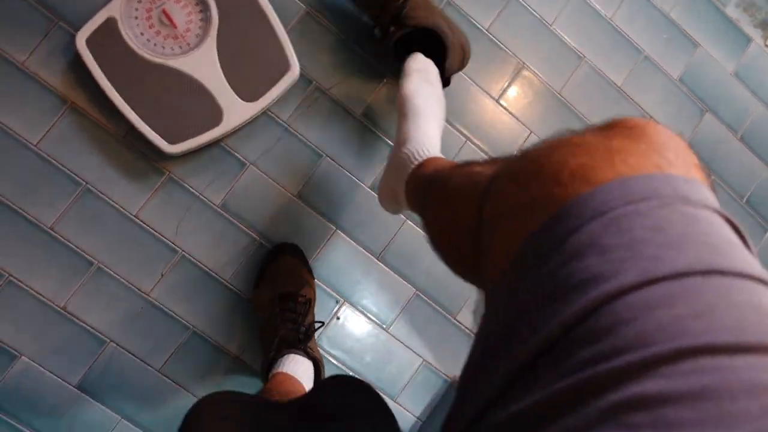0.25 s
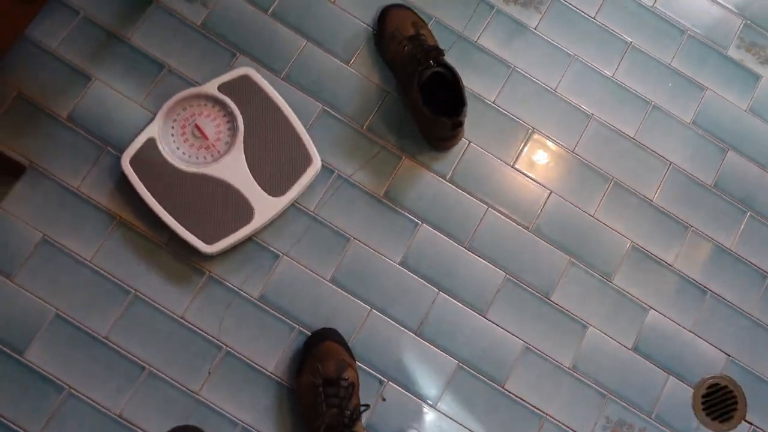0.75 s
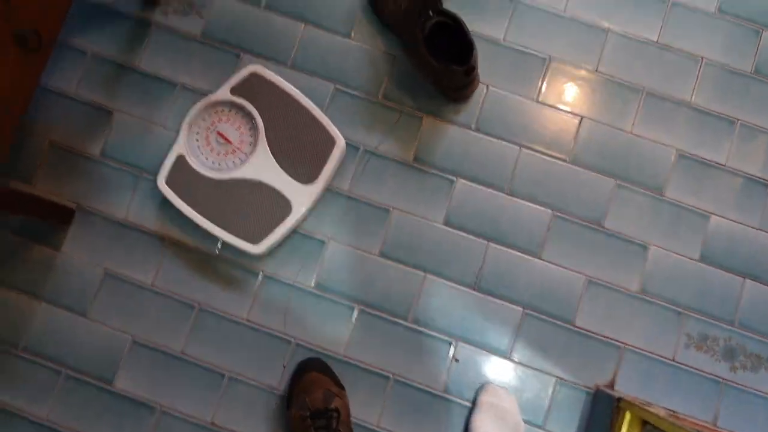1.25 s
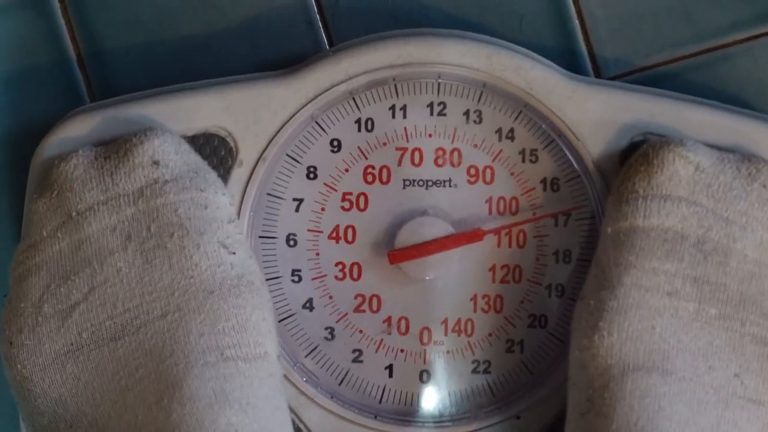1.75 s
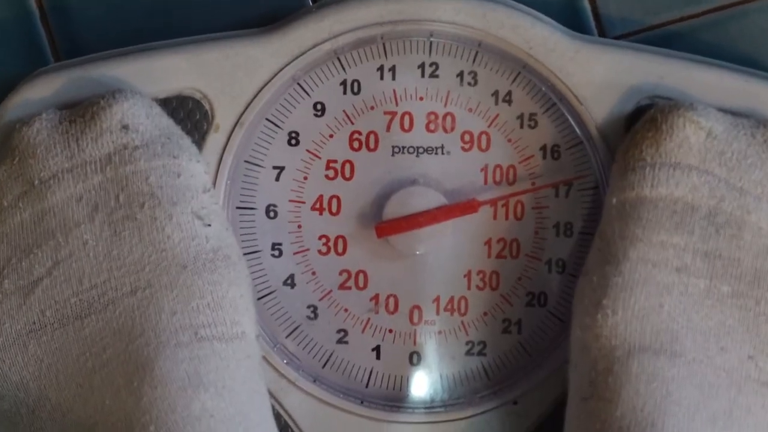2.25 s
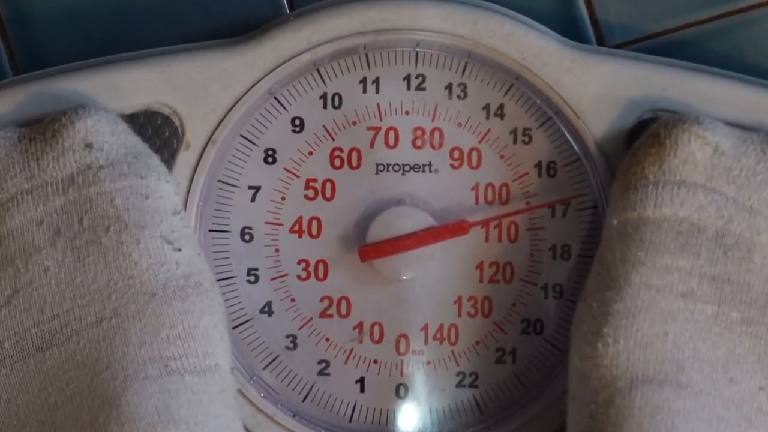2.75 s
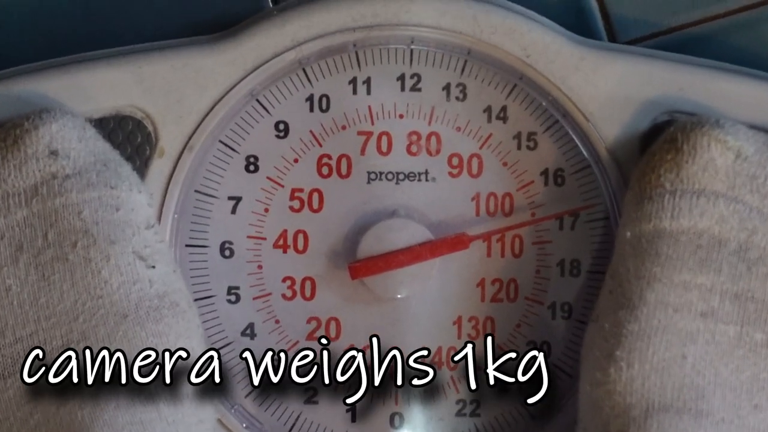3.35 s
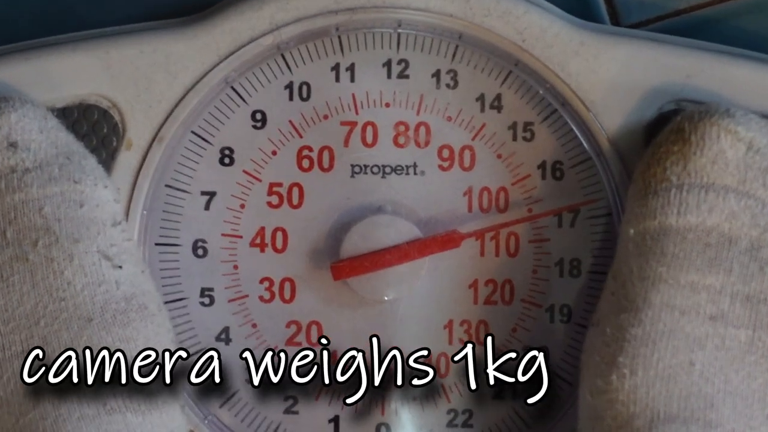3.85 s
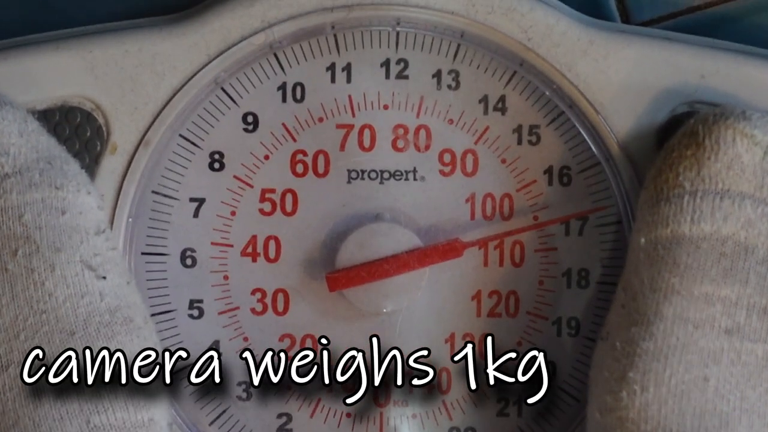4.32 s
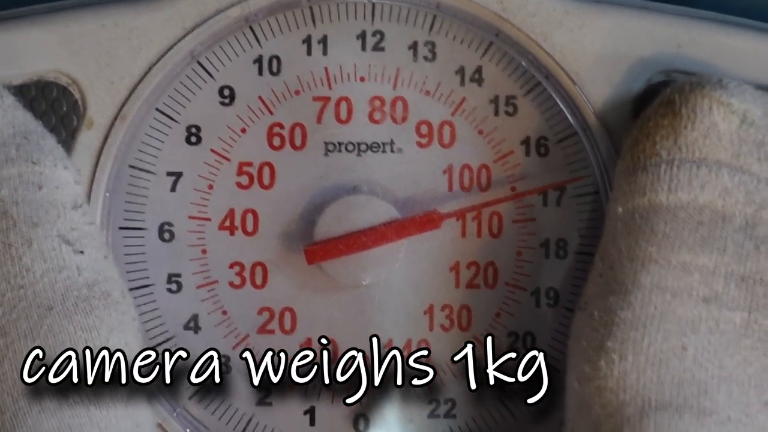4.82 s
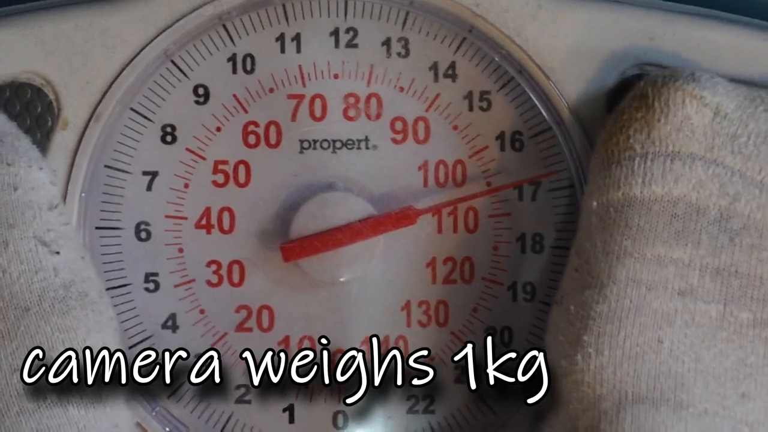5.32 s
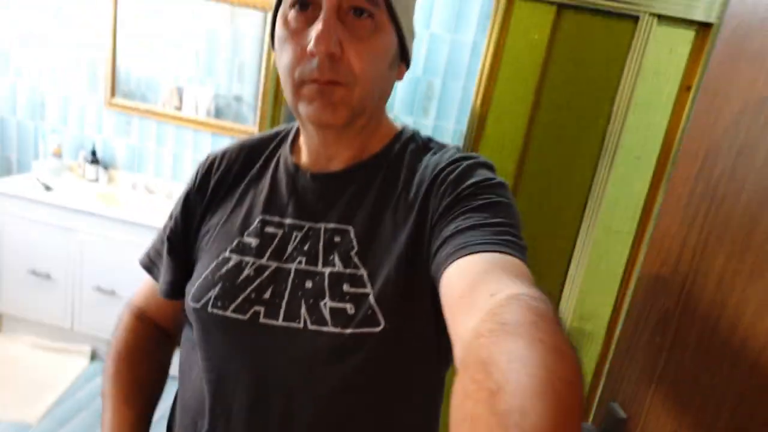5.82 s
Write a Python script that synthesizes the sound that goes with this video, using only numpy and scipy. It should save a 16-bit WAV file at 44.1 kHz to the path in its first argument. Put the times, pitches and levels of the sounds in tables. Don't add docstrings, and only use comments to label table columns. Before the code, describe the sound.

A close hand-held microphone in a tiled, ringing bathroom. At 0 s cloth brushes off a shoe, which is kicked with a hollow knock and bright slap. It lands with loud booms and hard slaps at about 0.37-0.45 s, bounces at 0.6 s and rocks at 0.75 s. Socks drag softly from 0.9 to 1.25 s, with two muted late shoe knocks. At 1.42-1.58 s a spring scale gives a swelling, gritty metallic rasp, cut short into a brief low settling. Then it is quiet: low hum, street wash, hiss, a faint engine around 2.6 and 3.1 s. A fluttering bird call that drops in pitch comes at 2, 3 and 4 s, with tiny distant twitters and a thin whistle near 2.5 s. Dry dial ticks at 5.3 s. At 5.67 s hum and street cease; until 6.1 s fingers click, bump and rustle on the camera casing.

```python
import sys
import numpy as np
from scipy import signal
from scipy.fft import rfft, irfft, next_fast_len
from scipy.io import wavfile
from scipy.ndimage import map_coordinates

SR = 44100
rng = np.random.default_rng(int(sys.argv[2]) if len(sys.argv) > 2 else 0)


def nominal_scale(level):
    x = np.asarray(level, float) / 20
    return 10 ** x


def generate_wav(sig):
    pcm = np.round(np.clip(np.atleast_2d(sig).T, -1, 1) * 32767).astype(np.int16)
    wavfile.write(sys.argv[1], SR, pcm)


N = 268216
T = np.arange(N) / SR
LEAD = 128

# freq_hz, likeness
FAR_LIKENESS = [(60, 1), (180, 0.71), (550, 0.14), (1650, 0.067), (4970, 0.3655), (15000, 0.57)]
NEAR_LIKENESS = [(60, .98), (500, .97), (1000, .86), (2000, .83), (4000, .73), (8000, .65)]
# freq_hz, t60_s
BATHROOM_T60 = [(150, 0.9), (500, 0.68), (2000, 0.49), (5000, 0.57), (12000, 0.49)]
YARD_T60 = [(2000, 0.42), (5000, 0.95)]
# freq_hz, width_hz, level_db
STANDING_WAVES = [(223.5, 3, -12), (421.7, 5.2, 10), (505, 9, -1.5), (563, 14, -1.5), (569, 10, -2),
                  (667, 16, -7)]

# freq_hz, level_db (per Hz)
HUM_TONE = [(15, -71.5), (25, -41), (37, -34.5), (46, -16), (56, -9), (75, 2), (129, -5), (162, 2.5),
            (188, -12.5), (221, 4), (281, -8), (441, -17.5), (500, -14), (650, -39), (1100, -120)]
STREET_TONE = [(180, -26.5), (300, -3.5), (366, -7.5), (760, -6.5), (886, -3), (1020, -9.5), (1800, -10),
               (2650, -21.5), (3120, -19), (4140, -33.5), (5000, -30), (6500, -46.5), (11000, -120)]
HISS_TONE = [(1760, -27.5), (3000, -6.5), (4170, -3), (4970, -6.5), (6300, -7), (15100, -12), (16000, -20)]
# hum_db, street_db, hiss_db
FIRST_BALANCE_DB = [5.3, 3.2, -1.5]
HUM_DB, STREET_DB, MIC_DB = -63.5, -64, -75.5
FIRST_CHANGE_S = 1.585
# start_s, end_s
SECOND_CHANGE = (5.664, 5.677)
DUCK_DB, RECOVER_AT_S, RECOVER_S = -5, 2.36, 0.07
RISE_DB = 19
# loudest_s, rise_s, level_db, fade_db_per_s
ENGINE = [
    (2.586, .25, -61.5, 11),
    (3.112, .2, -68, 30),
]
ENGINE_END = (2.96, 3.3)
ENGINE_TONE = [(225, -37.5), (255, -3.5), (270, 2.0), (300, -49.5)]  # freq_hz, level_db (per Hz)
# loudest_s, rise_s, level_db, fade_db_per_s
FAR_BIRDS = [
    (1.65, .15, -78.5, 127.5),
    (1.94, .011, -80.5, 249.5),
    (2.4, .025, -84.5, 13),
    (3.21, .6, -91, 150),
    (3.51, .06, -82, 42.5),
    (4.07, 0.01, -79.5, 132),
    (4.64, .025, -75.5, 73.5),
    (4.92, .05, -83, 3),
    (5.14, .4, -79, 69),
]
TWITTER_TONE = [(5000, -38), (5350, -3.5), (5700, 0), (6000, -35.5)]  # freq_hz, level_db (per Hz)
# time_s, pitch_hz, level_db
WHISTLE = [(2.43, 10250, -95), (2.5, 10400, -84), (2.58, 10520, -88), (2.63, 11100, -84), (2.7, 11100, -84),
           (2.73, 10700, -86), (2.8, 9400, -92), (2.83, 9100, -100)]

# start_s, stretch, pitch_ratio
CALLS = [
    (1.983, 1, 1.002),
    (3.003, 1.01, .995),
    (4.053, .98, .996),
]
CALL_LEVELS = [-64.5, -61.5, -62.5]
# start_hz, end_hz
NOTE_PITCH = [(2705, 2770), (3705, 3755), (4085, 4235), (4585, 4610)]
# start_db, end_db
NOTE_LEVEL = [(-15, 11.5), (4.5, 4), (7.5, 5.5), (-14.5, -11)]
# time_s, level_db
NOTE_SWELL = [(0, -11), (.03, -3.5), (.12, -2), (.2, -6), (.26, -13.5), (.275, -19)]
# time_s, pitch_hz
DROP_PITCH = [(.245, 4300), (.262, 4260), (.266, 3850), (.27, 3340), (.274, 2720), (.33, 2670), (.4, 2630),
              (.46, 2630)]
DROP_LEVEL = [-30, 4, 9, 8, 4, -5, -14, -34]

# start_s, peak_db, pitch_hz, top_db
CLICKS = [(5.2763, -43.5, 3150, -6), (5.2823, -22.5, 1645, -12), (5.2873, -32, 1700, -19),
          (5.3053, -39.5, 2060, -6), (5.7044, -47, 2700, -16.5), (5.7111, -50, 1720, -20),
          (5.742, -39, 2210, -17), (5.7471, -32, 1700, -30), (5.835, -48.5, 2000, -22),
          (5.875, -46.5, 1780, -10), (5.9075, -52.5, 1800, -7), (5.9944, -66.5, 2120, -2),
          (6.0352, -52.5, 3060, -7), (6.0494, -51, 1680, -9.5)]
# freq_hz, level_db
CLICK_TOP = [(3000, -42), (5000, -15.5), (9000, -5), (11000, -16), (16000, -11.5)]
# start_s, peak_db, knock_db
CASING_BUMPS = [
    (5.743, -46.5, 9),
    (5.747, -30.5, -1),
    (5.836, -49, -11),
    (5.877, -44, -7),
    (5.908, -51, -6),
    (5.936, -45, -13),
    (5.963, -43.5, -24),
    (5.994, -43, -18),
    (6.036, -42, -24),
    (6.047, -41, -13),
]
# time_s, effort_db
GRIP_EFFORT = [
    (5.675, -63),
    (5.753, -54.5),
    (5.863, -59),
    (5.937, -57),
    (6.082, -62.5),
]
# freq_hz, level_db (per Hz)
GRIP_TONE = [(470, 3), (800, 1), (1260, -5.5), (2070, -1), (2600, -6.5), (3100, -3.5), (3980, -5.5),
             (6020, -6.5), (11700, -17), (16000, -20.5)]
CASING_TONE = [(60, -2.5), (150, -2.5), (235, -0.5), (300, -10.5), (600, -15.5), (900, -44)]

# loudest_s, rise_s, drag_db, fibre_over_drag_db, fade_db_per_s
STROKES = [
    (0, .011, -50, -0.5, 29.5),
    (.042, 0.0071, -48.5, 13.5, 156.5),
    (0.969, 0.1, -50, -7.5, 36.5),
    (1.052, 0.17, -52.5, 0, 152.5),
    (1.156, 0.0078, -60.5, -14, 62.5),
    (1.233, .19, -47.5, -5, 116),
]
# freq_hz, level_db (per Hz)
CLOTH_TONE = [(400, -23), (1000, -4), (1500, -4), (2500, -8.5), (3500, -4), (5000, -26)]
FIBRE_TONE = [(2800, -22.5), (4500, 6), (7000, -1.5), (10000, -6.5), (16000, -16.5)]

# time_s, level_db
RASP_LEVEL = [(1.41, -29), (1.425, -26.5), (1.445, -22.5), (1.51, -19.5), (1.555, -21), (1.564, -30),
              (1.568, -50), (1.59, -59)]
# start_s, end_s; it breaks off as the scene changes
RASP_TIMES = (1.4197, 1.583)
# freq_hz, level_db (per Hz)
RASP_TONE = [(120, -57), (200, -32.5), (569, -24.5), (623, -26), (722, -20), (1100, -14), (1210, -13),
             (1910, -5.5), (2700, -8.5), (2960, -5.5), (7680, -6.5), (12800, -14), (16000, -26)]
SETTLE_TONE = [(88, -37.5), (150, -12.5), (216, -6.5), (243, -17), (504, 1), (941, -17.5), (1420, -18),
               (2500, -37), (3250, -63.5), (5500, -120)]
# freq_hz, width_hz, level_db
PLATFORM = [(1955, 51, -3), (2910, 49, -4.5), (3185, 44, -4.5), (4210, 120, 1.5), (5320, 110, -5.5),
            (8100, 82, -3.5), (8225, 38, -9.5), (8750, 58, -3.5), (9780, 43, -3), (10200, 47, -7.5)]

# start_s, hollow_db, hollow_hz, slap_db, grit_db
LANDINGS = [
    (.030, -24, 399, -40, -71),
    (.039, -30.5, 456, -14.5, -26),
    (0.367, -13.5, 539, -24, -42.5),
    (0.424, -30, 634, -5, -18),
    (.445, -14, 517, -26, -44),
    (.597, -29.5, 535, -45, -60),
    (.627, -20, 606, -16, -37.5),
    (.753, -36, 457, -45.5, -47),
    (1.1558, -31, 475.3, -31, -60),
    (1.229, -33, 620, -34, -55.5),
]
# pitch_multiple, width_hz, level_db
CAVITY = [(1, 44.7, -0.5), (1.121, 110, -5.5), (1.8, 398, -10.5)]
# freq_hz, width_hz, level_db
HEEL_THUD = (225, 160, -13)
# freq_hz, level_db
SLAP_TONE = [(300, -29), (900, -2.5), (1400, -2.5), (2100, 5.5), (2600, 2), (3200, -5.5), (4500, -21.5),
             (7000, -40.5)]
GRIT_TONE = [(2500, -30.5), (3800, 0.5), (6500, 3), (8500, -10), (16000, -39)]


def unit(x):
    return x / np.sqrt(np.mean(x ** 2) + 1e-20)


def along(points, hz):
    f, v = np.transpose(points)
    return np.interp(np.log(hz + 1), np.log(f + 1), v)


def levels(rows):
    s, *cols = np.transpose(rows)
    return [nominal_scale(np.interp(T, s, c, left=-150, right=-150)) for c in cols]


def swells(rows):
    shapes = []
    for s, rise, db, fade in rows:
        below_before = np.where(T < s - rise, 150, RISE_DB * (s - T) / rise)
        shapes.append(db - np.where(T < s, below_before, fade * (T - s)))
    return nominal_scale(np.max(shapes, axis=0))


def wobble(rate):
    return map_coordinates(rng.standard_normal(int(N * rate / SR) + 4), [T * rate])


def filtered(x, response):
    m = next_fast_len(x.shape[-1] + 8192)
    return irfft(rfft(x, m) * response(np.fft.rfftfreq(m, 1 / SR)), m)[..., :x.shape[-1]]


def modes(peaks):
    def response(f):
        return sum((-1) ** k * nominal_scale(db) * 1j * f * w / (c * c - f * f + 1j * f * w)
                   for k, (c, w, db) in enumerate(peaks))
    return response


def spread(pair, spectrum, alike):
    def response(hz):
        turn = np.arccos(np.clip(along(alike, hz), -1, 1)) / 2
        return nominal_scale(along(spectrum, hz)) * [np.cos(turn), np.sin(turn)]
    mid, side = filtered(pair, response)
    return unit(np.array([mid + side, mid - side]))


def rush(spectrum, grain_db=0, rate=300, alike=NEAR_LIKENESS):
    return unit(nominal_scale(grain_db * wobble(rate)) * spread(rng.standard_normal((2, N)), spectrum, alike))


def echo(x, walls):
    hz, t, z = signal.stft(rng.standard_normal((2, SR * 3 // 4)), SR, nperseg=256)
    decay = nominal_scale(-60 * t / along(walls, hz)[:, None])
    tail = signal.istft(z * decay, SR, nperseg=256)[1]
    tail = spread(tail, [(20, 0)], NEAR_LIKENESS)
    return signal.fftconvolve(x[None], tail / np.linalg.norm(tail[0]), axes=1)


def add(out, s, x):
    part = out[:, round(s * SR) - LEAD:][:, :x.shape[-1]]
    part += x[..., :part.shape[1]]


def contact(t60, blow, layers):
    t = np.arange(SR // 8) / SR
    burst = rng.standard_normal(len(t)) * nominal_scale(-60 * t / max(t60, .002))
    burst[0] = blow
    burst = np.pad(burst, (LEAD, 0))
    shaped = [(gain, filtered(burst, response)) for gain, response in layers]
    return sum(gain * x / np.abs(x).max() for gain, x in shaped)


def background():
    ducked_db = DUCK_DB / (1 + np.exp((T - RECOVER_AT_S) / RECOVER_S))
    hum, street, mic = [nominal_scale(db + np.where(T < FIRST_CHANGE_S, more_db, ducked_db))
                        for db, more_db in zip((HUM_DB, STREET_DB, MIC_DB), FIRST_BALANCE_DB)]
    air = hum * rush(HUM_TONE, 0.77, 15, FAR_LIKENESS)
    air = air + street * rush(STREET_TONE, .8, 14, FAR_LIKENESS)
    passing = sum(swells([row]) * (T < end) for row, end in zip(ENGINE, ENGINE_END))
    engine = passing * rush(ENGINE_TONE, 2.07, 6, FAR_LIKENESS)
    twitter = swells(FAR_BIRDS) * rush(TWITTER_TONE, 2.5, 27, FAR_LIKENESS) * (T < SECOND_CHANGE[0])
    hiss = mic * rush(HISS_TONE, alike=FAR_LIKENESS)
    return air * (T < SECOND_CHANGE[1]) + engine + twitter + hiss


def far_whistle():
    s, hz, db = np.transpose(WHISTLE)
    phase = 2 * np.pi * np.cumsum(np.interp(T, s, hz)) / SR
    return levels(np.c_[s, db])[0] * nominal_scale(3.07 * wobble(30)) * np.sqrt(2) * np.sin(phase)


def bird():
    out = np.zeros((2, N))
    t = np.arange(SR // 2) / SR

    def tone(hz):
        flutter = nominal_scale((3 * wobble(80) + 3 * wobble(400))[:len(t)])
        unsteady_hz = hz * (1 + .005 * wobble(60)[:len(t)])
        return flutter * np.sin(2 * np.pi * np.cumsum(unsteady_hz) / SR)

    for (s, stretch, ratio), db in zip(CALLS, CALL_LEVELS):
        u = t / stretch
        way = np.clip(u / .26, 0, 1)
        note = 0
        for (a, b), (a_db, b_db) in zip(NOTE_PITCH, NOTE_LEVEL):
            note = note + nominal_scale(a_db + (b_db - a_db) * way) * tone(ratio * (a + (b - a) * way))
        knots, hz = np.transpose(DROP_PITCH)
        drop = nominal_scale(np.interp(u, knots, DROP_LEVEL)) * tone(ratio * np.interp(u, knots, hz))
        swell = nominal_scale(np.interp(u, *np.transpose(NOTE_SWELL)))
        call = nominal_scale(db) * (swell * note + nominal_scale(5.5) * drop)
        add(out, s, nominal_scale(-8.5) * call * nominal_scale([[-1.5], [1.5]]))
        add(out, s, nominal_scale(1.5) * echo(call, YARD_T60) * nominal_scale([[-.8], [.8]]))
    return out


def dial_and_fingers():
    out = np.zeros((2, N))
    for s, db, hz, top_db in CLICKS:
        body = modes([(1050, 500, -14), (hz, 150, 5), (2900, 1200, -2.5)])
        layers = [(nominal_scale(db - 0.5), lambda f: body(f) / (1 + 1j * f / 4000)),
                  (nominal_scale(db + top_db + 10.5), lambda f: nominal_scale(along(CLICK_TOP, f)))]
        tick = contact(.012, 4.7, layers)
        add(out, s, tick)
        add(out, s + .003, nominal_scale(-17.5) * echo(tick, BATHROOM_T60))
    thump = modes([(233, 120, 0)])
    knock = modes([(600, 400, 0), (950, 400, -4)])
    for s, db, knock_db in CASING_BUMPS:
        layers = [(nominal_scale(db - 1.5), lambda f: thump(f) ** 2), (nominal_scale(db + knock_db), lambda f: knock(f) ** 2)]
        add(out, s, contact(0.0068, 9.2, layers))
    grip, = levels(GRIP_EFFORT)
    rustle = grip * rush(GRIP_TONE, grain_db=3.0, rate=81)
    rumble = nominal_scale(-1) * grip * rush(CASING_TONE, grain_db=1.5, rate=26)
    return out + rustle + rumble


def socks():
    drag = swells([(s, rise, db, fade) for s, rise, db, _, fade in STROKES])
    fibres = swells([(s, rise, db + fibre_db, fade) for s, rise, db, fibre_db, fade in STROKES])
    cloth = drag * rush(CLOTH_TONE, grain_db=2.0, rate=100)
    return cloth + fibres * rush(FIBRE_TONE, grain_db=1.5, rate=200)


def scale():
    platform = modes(PLATFORM)
    rubbing = rush(RASP_TONE, grain_db=1.8, rate=900)
    rasp = unit(filtered(rubbing, lambda f: .38 + platform(f)))
    loaded = (T > RASP_TIMES[0]) * (T < RASP_TIMES[1])
    settling = swells([(1.6, .06, -46.5, 117)])
    return loaded * levels(RASP_LEVEL)[0] * rasp + settling * rush(SETTLE_TONE, grain_db=-3.0, rate=40)


def heel_cup():
    out = np.zeros((2, N))
    t = np.arange(SR // 2) / SR
    start_s, peak_db, pitch_hz, attack_s, t60_s = .029, -26, 441, .005, .2
    envelope = 2 * nominal_scale(peak_db - 60 * t / t60_s) * (1 - np.exp(-t / attack_s))
    ring = envelope * np.sin(2 * np.pi * pitch_hz * t)
    add(out, start_s, np.pad(ring, (LEAD, 0)))
    add(out, start_s, nominal_scale(-7) * echo(ring, BATHROOM_T60))
    return out


def shoe():
    out = np.zeros((2, N))
    direct_db, walls_db, standing_db = -3.5, 5, 8.5

    def soft(f):
        return 1j * f / (90 + 1j * f) / (1 + 1j * f / 1300) ** 2

    for s, db, hz, slap_db, grit_db in LANDINGS:
        cavity = modes([HEEL_THUD] + [(k * hz, w, level) for k, w, level in CAVITY])
        layers = [(nominal_scale(db), lambda f: cavity(f) * soft(f)),
                  (nominal_scale(slap_db), lambda f: nominal_scale(along(SLAP_TONE, f))),
                  (nominal_scale(grit_db), lambda f: nominal_scale(along(GRIT_TONE, f)))]
        hit = contact(.003, 8, layers)
        add(out, s, nominal_scale(direct_db) * hit)
        add(out, s + .003, nominal_scale(walls_db) * echo(hit, BATHROOM_T60))
        ringing_room = filtered(np.pad(hit, (0, SR)), modes(STANDING_WAVES))
        add(out, s + .003, nominal_scale(standing_db) * ringing_room)
    return out


def scene():
    outside = background() + far_whistle() + bird()
    return outside + dial_and_fingers() + socks() + scale() + heel_cup() + shoe()


def band_limit(x):
    return signal.sosfilt(signal.butter(12, 15900, fs=SR, output="sos"), x)


def record(dry):
    start, end = SECOND_CHANGE
    dip = np.clip(np.abs(T - np.mean(SECOND_CHANGE)) / (end - start) * 2, .15, 1)
    thin = filtered(dry, lambda f: (1j * f / (45 + 1j * f)) ** 2)
    return band_limit(thin * dip)


dry = scene()
out = record(dry)
generate_wav(out)
```